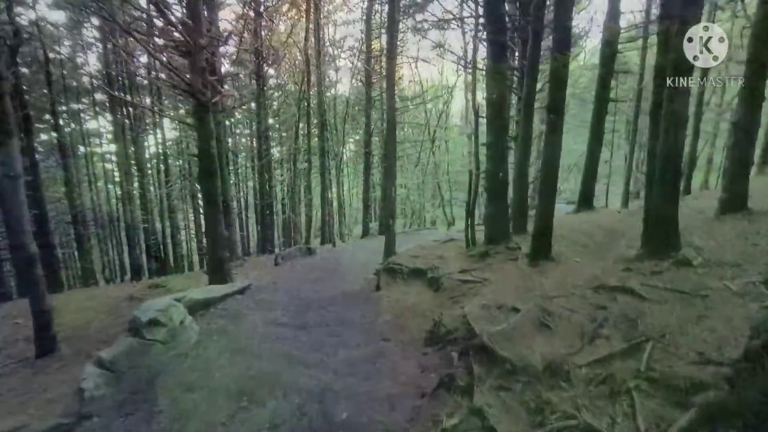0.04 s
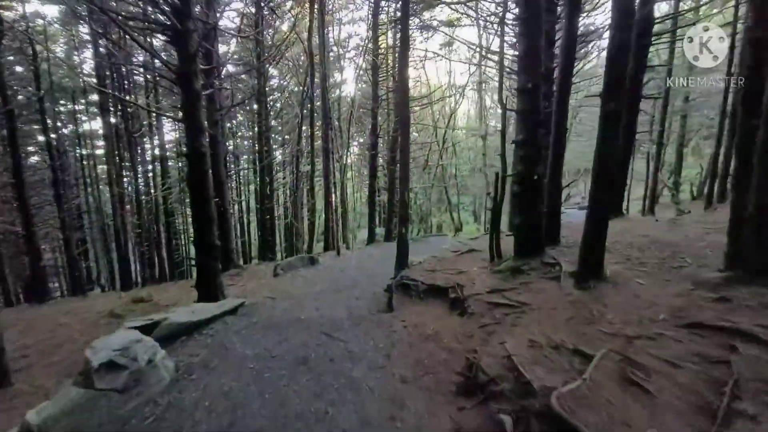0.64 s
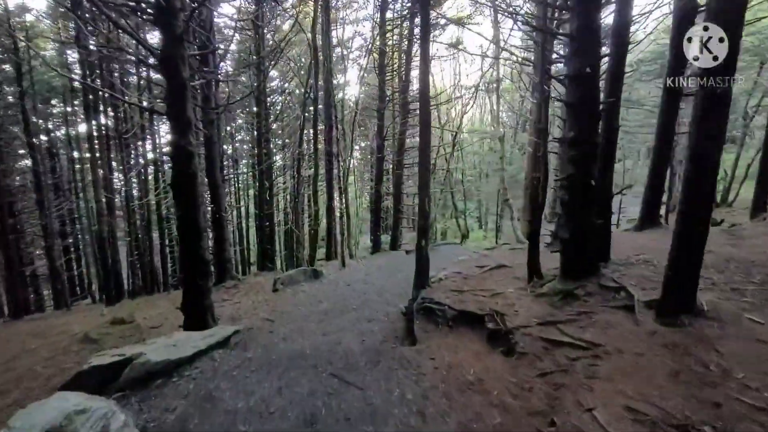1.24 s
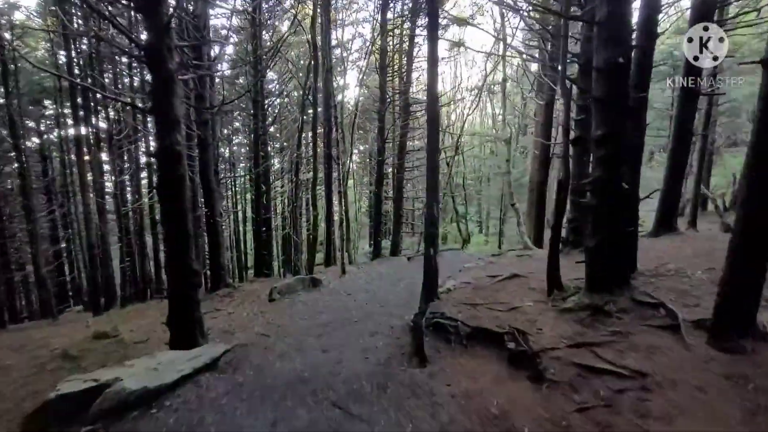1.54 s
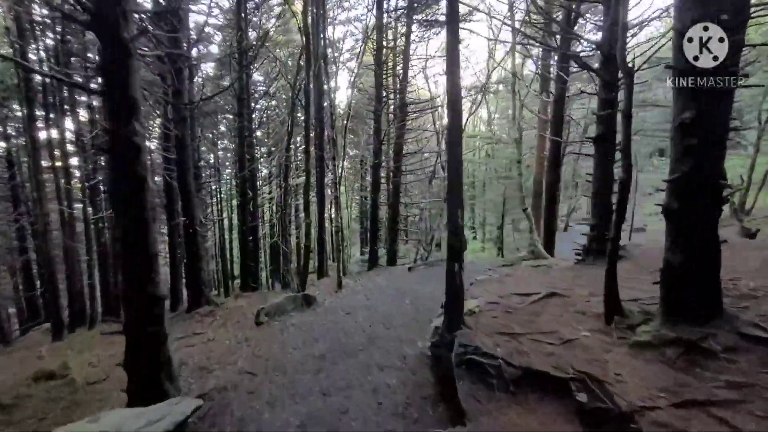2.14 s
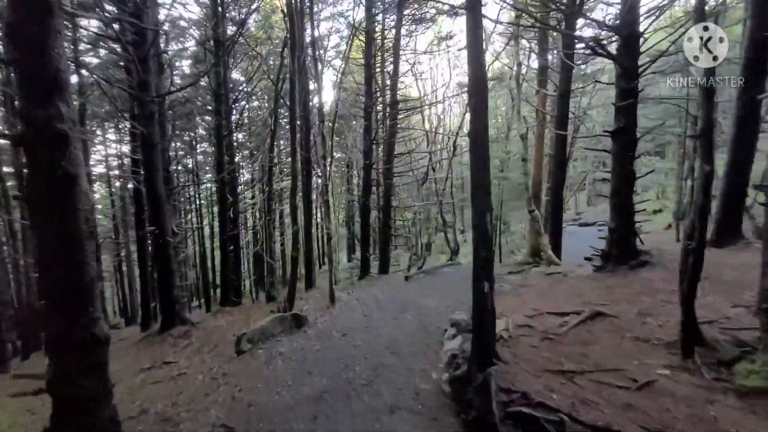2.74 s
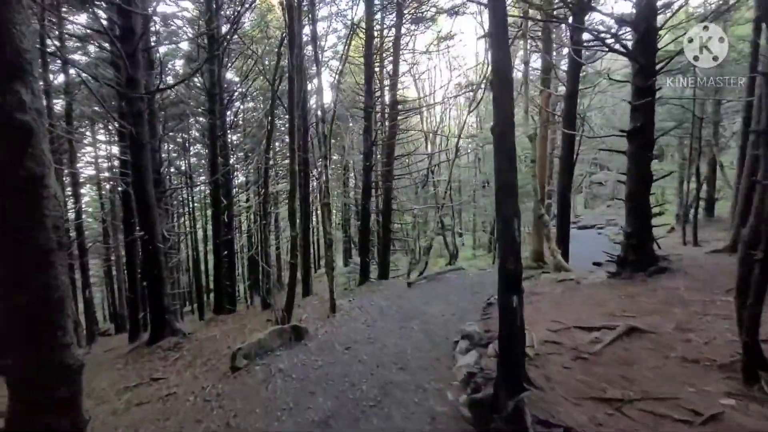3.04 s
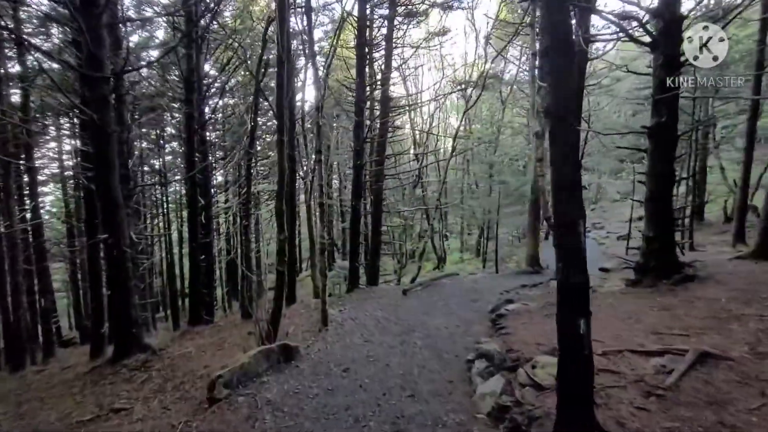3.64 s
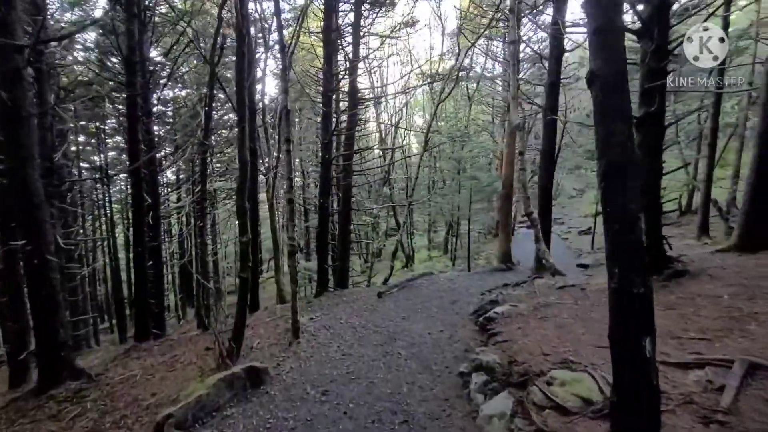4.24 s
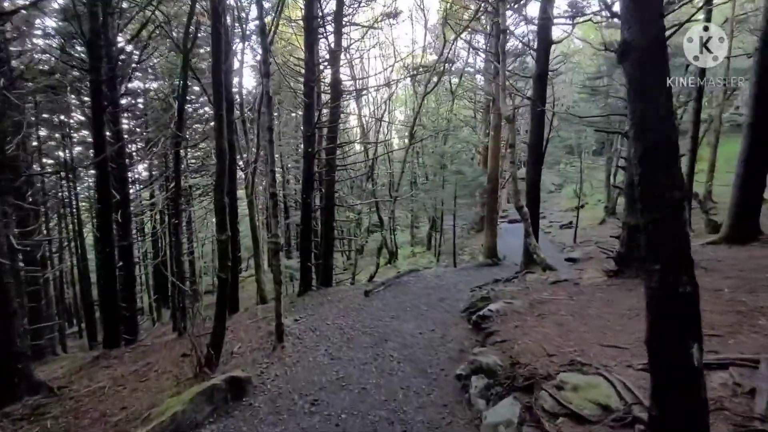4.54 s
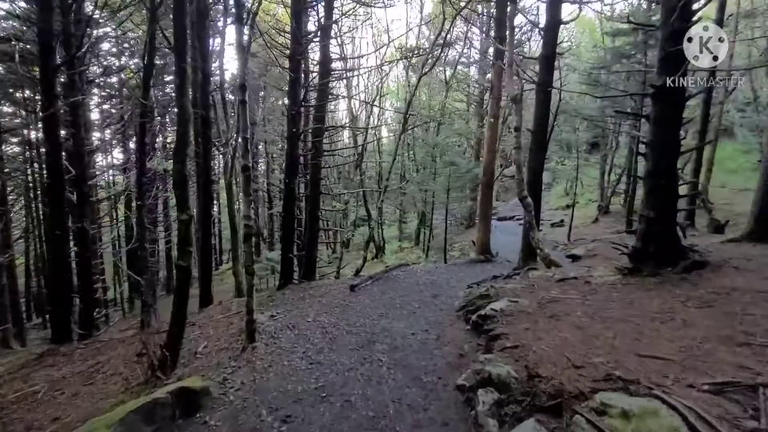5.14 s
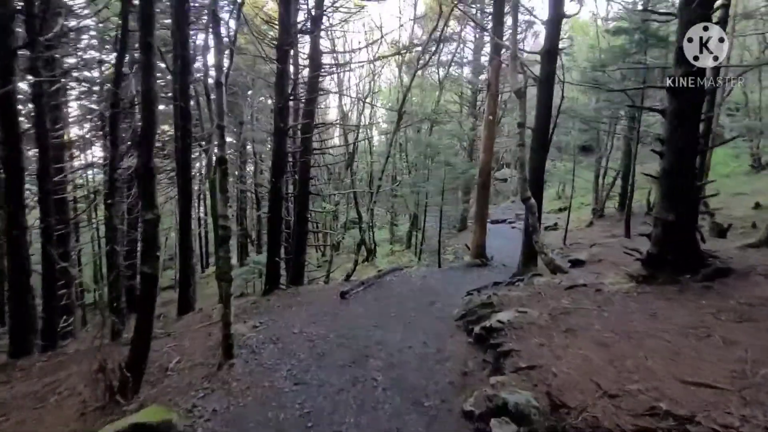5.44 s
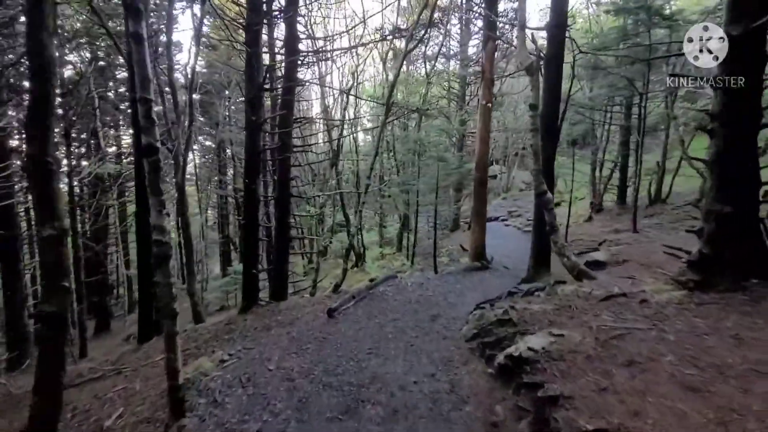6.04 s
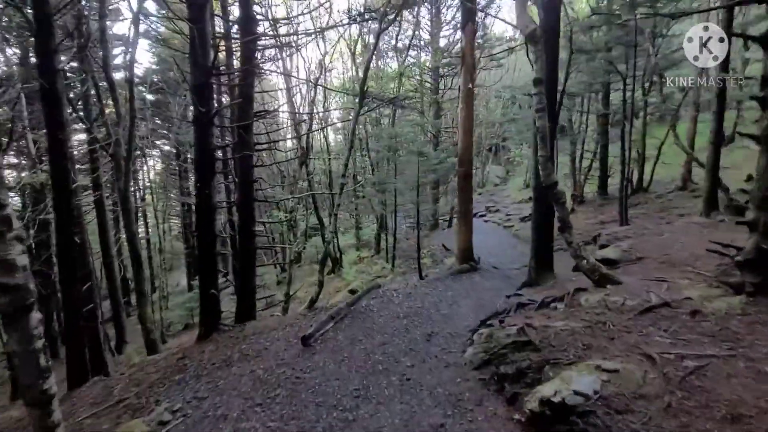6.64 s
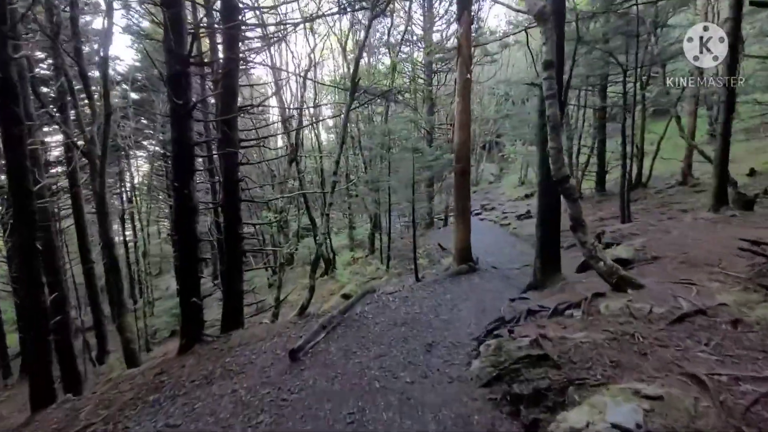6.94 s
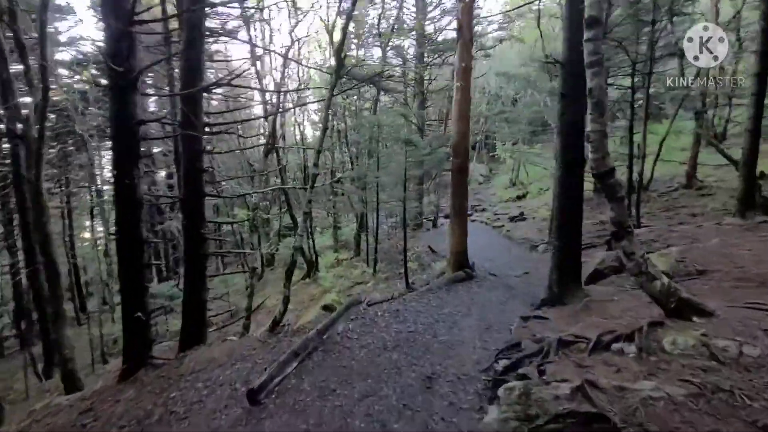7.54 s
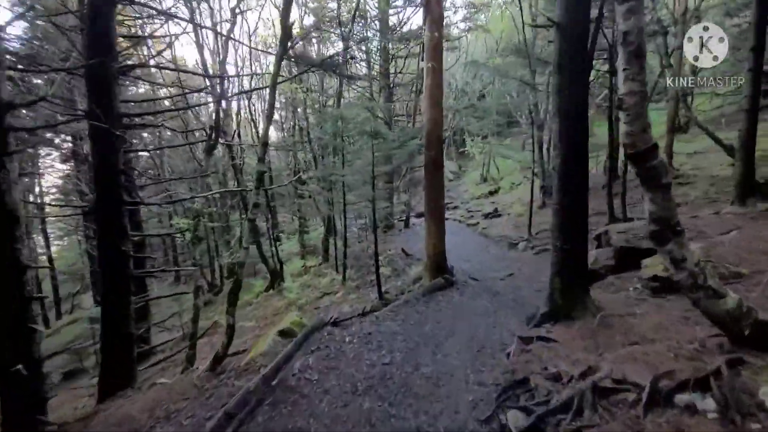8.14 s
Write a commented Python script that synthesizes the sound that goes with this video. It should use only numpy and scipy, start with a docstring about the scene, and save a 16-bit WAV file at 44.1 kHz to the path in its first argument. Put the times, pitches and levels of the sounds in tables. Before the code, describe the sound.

Steady footsteps crunch on a gravel forest path, with a rustling jacket, low wind bumps on the microphone and a faint, high bird.

```python
"""On a gravel trail through woodland, a hiker walks along with a camera in hand.
Boots thud on packed earth and grind the gravel, and single stones snap against each other.
A nylon jacket rustles as the arms swing, and squeaks near the start as its seams rub.
Wind bumps the microphone early and late, over the soft hush of air in the treetops.
A small bird pips, then sings six thin notes, each higher than the last. Tree trunks add faint echoes."""
import sys
import numpy as np
from scipy import signal
from scipy.fft import rfft, irfft, next_fast_len
from scipy.io import wavfile
from scipy.ndimage import uniform_filter1d, map_coordinates

SR = 44100
rng = np.random.default_rng(int(sys.argv[2]) if len(sys.argv) > 2 else 0)


def dump(signal):
    """Clip the signal to [-1, 1] and save it as 16-bit WAV at the path in sys.argv[1]."""
    limited = np.clip(np.atleast_2d(signal).T, -1, 1)
    pcm = np.round(limited * 32767).astype(np.int16)
    wavfile.write(sys.argv[1], SR, pcm)


N = 369999
TIME = np.arange(N) / SR
STRIKE_S = 0.0075  # how long a boot's edge takes to dig in

# The footsteps. Each row: heel strike in seconds, heel level in dB, time of full weight in seconds,
# crunch level in dB, roll-off in seconds, pitch of the stones under the sole in Hz, their strength in dB.
STEPS = [(0.49, -53.5, 0.545, -54.5, 0.66, 1400, 12), (1.008, -60, 1.128, -49, 1.163, 1440, -4.5),
         (1.546, -49.5, 1.625, -46, 1.67, 1680, -7), (2.083, -54.5, 2.135, -44.5, 2.175, 1750, -2),
         (2.593, -52, 2.675, -50.5, 2.73, 1730, -13), (3.172, -51, 3.27, -50.5, 3.29, 1600, -7),
         (3.706, -62, 3.748, -49.5, 3.825, 1590, -6), (4.262, -56.5, 4.34, -55, 4.41, 1480, 0),
         (4.965, -56, 5.065, -54.5, 5.09, 1450, -9), (5.426, -48, 5.47, -47.5, 5.51, 1590, 7),
         (5.897, -51.5, 5.995, -53.5, 6.04, 1420, -13), (6.445, -41, 6.48, -42.5, 6.56, 1520, 8),
         (7.009, -46.5, 7.08, -47, 7.105, 1330, -14), (7.544, -45.5, 7.635, -49.5, 7.648, 1670, -6),
         (8.03, -59, 8.1, -54, 8.14, 1500, 9)]
# The tone of grit under a boot. Each row: frequency in Hz, level in dB.
GRAVEL = [(90, -18), (200, -11), (400, 0), (650, 0.5), (900, 1), (1300, 1.5), (1750, 1.5), (2500, -3),
          (3800, -3.5), (5500, -14.5), (8000, -21), (15000, -28)]
# How alike left and right are for jacket and treetops. Each row: frequency in Hz, likeness (1 = same).
AIR_LIKENESS = [(100, 0.76), (350, 0.45), (900, -0.15), (2000, -0.3), (4000, 0.17), (8000, -0.15),
                (14000, 0.12)]
# Which side those two sounds favour. Each row: frequency in Hz, left minus right in dB.
AIR_BALANCE = [(200, 0.5), (1200, 2.5), (2700, -2.5), (4200, -0.5), (5600, 4), (7200, 10), (9500, -0.5),
               (14000, 2)]


def amp(db):
    """Turns decibels into a number to multiply by."""
    return 10 ** (np.asarray(db) / 20)


def unit(x):
    """Scales a signal so that its average strength (rms) is 1."""
    return x / np.sqrt(np.mean(x ** 2) + 1e-20)


def at_hz(table, hz):
    """Looks up a frequency in a table, blending between rows on a log-frequency scale."""
    freqs, values = np.transpose(table)
    return np.interp(np.log(hz + 1), np.log(abs(freqs) + 1), values)


def add(mix, start_s, sound):
    """Mixes a sound in at the given time."""
    part = mix[max(round(start_s * SR), 0):][:len(sound)]
    part += sound[:len(part)]


def filtered(x, gain):
    """Multiplies each frequency f in a signal by gain(f)."""
    size = next_fast_len(N + 4096, True)
    return irfft(rfft(x, size) * gain(np.fft.rfftfreq(size, 1 / SR)), size)[..., :N]


def drift(per_s):
    """A random wander of strength 1 that heads for a new value per_s times a second."""
    targets = rng.standard_normal(N // 8)
    return unit(np.interp(TIME * per_s, np.arange(len(targets)), targets))


def swell(centre_s, width_s):
    """A smooth rise and fall of height 1."""
    return np.exp(-.5 * ((TIME - centre_s) / width_s) ** 2)


def after_steps(lag_s, width_s):
    """A swell after every heel strike, or before it if the lag is negative."""
    return sum(swell(step[0] + lag_s, width_s) for step in STEPS)


def grains(per_s, spread_db):
    """Random clicks of uneven size, at the same moments on the left and right."""
    sizes = amp(spread_db * np.minimum(rng.exponential(1, N), 4))
    hits = rng.random(N) < per_s / SR
    return unit(sizes * hits * rng.choice([-1., 1.], (2, N)))


def patchy(x, patch_db, wide_hz, long_s):
    """Makes random bands of pitch louder or softer for a moment, as when contacts come and go."""
    spectrum = signal.stft(x, SR, nperseg=512, noverlap=384)[2]
    rows, columns = np.indices(spectrum.shape[1:])
    where = [rows * SR / 512 / wide_hz, columns * 128 / SR / long_s]
    patches = map_coordinates(rng.standard_normal((200, 1500)), where, order=1, mode="wrap")
    gain = unit(amp(patch_db * unit(patches)))
    return signal.istft(spectrum * gain, SR, nperseg=512, noverlap=384)[1][:, :N]


def stereo(pair, tone, likeness, balance, lead=((1, 0),)):
    """Blends two signals into left and right, using tables of tone, likeness, balance and phase lead."""
    alike = lambda f: np.clip(at_hz(likeness, f), -1, 1)
    right = filtered(pair[0], alike) + filtered(pair[1], lambda f: np.sqrt(1 - alike(f) ** 2))
    lean = lambda f: amp(at_hz(balance, f) / 2) * np.exp(.5j * at_hz(lead, f))
    gains = lambda f: amp(at_hz(tone, f)) * np.array([lean(f), 1 / lean(f)])
    return filtered(np.array([pair[0], right]), gains)


def on_ground(pair, tone=((1, 0),)):
    """Places a sound at the hiker's feet, as the two sides of the microphone hear it."""
    # How alike the sides are. Each row: frequency in Hz, likeness (1 = same).
    likeness = [(200, 1), (1200, 0.75), (1800, 0.91), (3800, 1), (7000, 0.22), (14000, .1)]
    # Which side is louder. Each row: frequency in Hz, left minus right in dB.
    balance = [(400, -1), (1100, -1.5), (1700, -8), (2700, -3), (4200, -5), (7000, 7), (11000, -1)]
    # Which side is ahead. Each row: frequency in Hz, the left side's lead in radians.
    lead = [(150, 0.27), (500, 1.5), (1100, -1), (1800, 0.43), (2700, 0.81), (4000, 1.7), (7000, 1.8)]
    return stereo(pair, tone, likeness, balance, lead)


def treetop_hush(level_db=-65.5):
    """Far-off air moves through the treetops with a gently uneven level."""
    # The tone of the hush. Each row: frequency in Hz, level in dB.
    tone = [(30, -6.5), (65, 8.5), (100, -2), (135, -2), (220, -3.5), (390, 3), (710, -6.5), (1000, -7.5),
            (1830, -2.5), (2500, -10), (3900, -8), (6000, -22.5), (7200, -20), (9500, -24), (15400, -23.5)]
    air = rng.standard_normal((2, N)) * amp(.5 * drift(11))
    air = patchy(air, patch_db=2.63, wide_hz=219, long_s=0.05)
    air = stereo(air, tone, AIR_LIKENESS, AIR_BALANCE)
    return amp(level_db) * air / np.std(air.mean(0))


def wind():
    """Swirls of air bump each side of the microphone; hard gusts add smaller, higher-sounding swirls."""
    # The strength of the breeze. Each row: time in seconds, level in dB.
    gusts = [(0, -42.5), (.25, -43.5), (.38, -33), (.55, -44.5), (.78, -45), (1.12, -65.5), (3, -79),
             (4.85, -76), (5.7, -62.5), (6.3, -71), (6.86, -75.5), (6.91, -54.5), (8.39, -56.5)]
    # Single puffs within it. Each row: time in seconds, boost in dB.
    puffs = [(.69, 4.5), (1.46, 8), (2.16, 8), (5.05, 19), (6.59, 14), (7.28, 6), (7.44, 7.5), (7.6, 0),
             (7.91, 8.5), (8.24, 6)]
    # The tone of the rumble. Each row: frequency in Hz, level in dB.
    rumble = [(10, -18), (25, -2), (42, -2.5), (60, 3.5), (85, -7.5), (110, -15), (150, -33), (230, -37),
              (500, -67), (2000, -93)]
    # The side the wind comes from. Each row: time in seconds, left minus right in dB.
    sides = [(0, 11.5), (.45, 2), (.7, 5.5), (2, -5.5), (6, -8.5), (7.1, -3.5), (7.7, -7), (8.39, -5)]
    jolt_db = 4 * (after_steps(lag_s=0.087, width_s=0.066) - .5)  # each step swings the microphone
    gust_db = np.interp(TIME, *np.transpose(gusts)) + jolt_db + 3.1 * drift(22)
    gust_db += sum(db * swell(s, width_s=0.028) for s, db in puffs)
    big = stereo(rng.standard_normal((2, N)), rumble, likeness=[(30, 0.024)], balance=[(30, 0.018)])
    big /= np.sqrt(uniform_filter1d(big.mean(0) ** 2, size=5000) + 1e-12)  # the gust sets the strength
    higher_tone = lambda f: amp(at_hz(rumble, f / 1.28) + at_hz([(60, -27), (110, 5)], f))
    small = unit(filtered(rng.standard_normal((2, N)), higher_tone))
    small_db = np.minimum(2.9 * (gust_db + 44), 0) - 13
    lean_db = np.interp(TIME, *np.transpose(sides)) * np.array([[.5], [-.5]])
    return (big + small * amp(small_db)) * amp(gust_db + lean_db)


def jacket_rustle():
    """Nylon rubs with the swing of the arms, making a fine, dense crackle."""
    # How briskly the jacket moves. Each row: time in seconds, level in dB.
    movement = [(0, -82), (.6, -79), (1.7, -78), (2.7, -77), (3.05, -85), (3.3, -75.5), (4.2, -85.5),
                (4.75, -84.5), (5, -78), (5.6, -72), (6.3, -72.5), (6.9, -77), (7.7, -73.5), (8.39, -74)]
    # The tone of rubbing nylon. Each row: frequency in Hz, level in dB.
    nylon = [(120, 9), (350, 14), (700, 18), (1000, 12), (1900, 15), (2700, 11), (4000, 9.5), (5500, 3.5),
             (7000, -1), (9000, -1.5), (12500, -1), (15000, -2.5)]
    # The jacket calms just before a heel strike and is jolted just after it.
    # Each row: delay from the strike in seconds, width in seconds, change in dB.
    rubs = [(-.075, 0.076, -1.5), (.055, 0.048, 3.5)]
    # A sleeve brushes the hiker's side. Each row: time in seconds, width in seconds, change in dB.
    sleeves = [(.1, 0.027, -2), (.48, 0.046, 5.5), (.75, 0.043, 1.5), (1.49, .02, 3.5), (1.85, 0.0088, 3.5),
               (3.93, 0.024, 8), (4.53, 0.056, 9), (6.245, 0.011, 5), (6.74, 0.057, 5.5),
               (7.41, 0.065, 3.5), (7.8, 0.058, 4.5)]
    fibres = grains(per_s=7000, spread_db=-0.5) * amp(1.57 * drift(70))
    fibres = patchy(fibres, patch_db=2.5, wide_hz=273, long_s=.04)
    rustle = stereo(fibres, nylon, AIR_LIKENESS, AIR_BALANCE)
    rustle /= band_strength(rustle, 8500, 15000)
    swing_db = sum(db * after_steps(lag_s, width_s) for lag_s, width_s, db in rubs)
    swing_db += sum(db * swell(s, width_s) for s, width_s, db in sleeves)
    return rustle * amp(np.interp(TIME, *np.transpose(movement)) + swing_db - 0.5)


def band_strength(pair, low_hz, high_hz):
    """The strength (rms) between two frequencies, with left and right averaged."""
    return np.std(filtered(pair.mean(0), lambda f: (f > low_hz) & (f < high_hz))) + 1e-12


def pebbles(clicks, ring_gain, cycles, sizes=12):
    """Each click briefly rings a pebble, whose size sets its pitch."""
    which = rng.integers(0, sizes, N)
    t, rings = np.arange(512) / SR, np.zeros((2, N))
    for k, hz in enumerate(np.geomspace(450, 4200, sizes)):
        ring = np.exp(-t * hz / cycles) * np.cos(2 * np.pi * hz * t) * hz / SR / cycles
        rings += signal.oaconvolve(clicks * (which == k), ring[None], axes=1)[:, :N]
    return clicks + ring_gain * rings


def bite(t, fade_s):
    """A boot's edge digs in: the level rises quickly up to t = 0, then fades."""
    return np.clip(1 + t / STRIKE_S, 0, 1) ** 2 * np.exp(-np.maximum(t, 0) / fade_s)


def gravel_crunch(loading_db=-13.5, easing_db=-8.5, settle_db_per_s=227):
    """Pebbles slip under each boot: open grit at the heel, a hollow scrunch as the sole covers them."""
    # A boot lightly skims the gravel. Each row: time in seconds, level in dB.
    scuffs = [(0.048, -64), (1.221, -55.5), (1.775, -60.5), (2.77, -65.5), (3.861, -65), (4.016, -58.5),
              (5.391, -62), (6.23, -62), (7.69, -63)]
    slips = pebbles(grains(per_s=1700, spread_db=3.5), ring_gain=3.55, cycles=2.1)
    slips = patchy(slips, patch_db=2.0, wide_hz=326.6, long_s=.05)
    slips /= np.sqrt(abs(uniform_filter1d((slips ** 2).mean(0), size=700)) + 1e-6)  # stones share the load
    grit = on_ground(slips, GRAVEL)
    strength = band_strength(grit, 800, 3000)
    out = np.zeros((2, N))
    for heel_s, heel_db, full_s, crunch_db, off_s, ring_hz, ring_db in STEPS:
        on = (TIME > heel_s - STRIKE_S) & (TIME < off_s + 40 / settle_db_per_s)
        t = TIME[on]
        sole_db = crunch_db + np.interp(t, [heel_s, full_s, off_s], [loading_db, 0, easing_db])
        sole_db -= settle_db_per_s * np.maximum(t - off_s, 0)
        heel = amp(heel_db) * bite(t - heel_s, fade_s=0.034)
        sole = amp(sole_db) * bite(t - heel_s, fade_s=np.inf)
        hollow = signal.lfilter(*signal.iirpeak(ring_hz, Q=2.4, fs=SR), grit[:, on])
        hollow *= strength / np.std(hollow.mean(0))
        covered = amp(ring_db) * (1 - np.exp(-(t - t[0]) / 0.042))
        out[:, on] += np.hypot(heel, sole) * (grit[:, on] + covered * hollow) / (1 + 1.19 * covered)
    out += grit * sum(amp(db) * bite(TIME - s, fade_s=0.033) for s, db in scuffs)
    # A few loose pebbles keep shifting, and calm down just before each step.
    loose = pebbles(grains(per_s=320, spread_db=3.0), ring_gain=4.8, cycles=1.7)
    loose *= amp(-6 * after_steps(lag_s=-0.16, width_s=0.16))
    return (out + on_ground(unit(loose) * amp(-76.5), GRAVEL)) / strength


def knock(hz, cycles, phase):
    """A short ring that swells for the given number of cycles, then dies away."""
    t = np.arange(SR // 20) / SR
    age = t * hz / cycles
    return age * np.exp(1 - age) * np.sin(2 * np.pi * (hz * t + phase))


def stone_snaps():
    """A stone snaps against another, settles with a second touch and rattles its neighbours."""
    # The loudest stones. Each row: time in seconds, level in dB, pitch in Hz.
    hits = [(0.065, -33.5, 2560), (0.315, -39.5, 1640), (0.585, -37, 1240), (0.611, -37.5, 1330),
            (0.646, -41, 1360), (0.655, -35.5, 1420), (0.671, -39.5, 1800), (1.012, -29.5, 3230),
            (1.115, -39, 1130), (1.197, -38, 2080), (1.255, -42, 1850), (1.621, -25, 1370),
            (2.186, -18, 1860), (2.502, -40.5, 1800), (2.716, -34.5, 2200), (2.901, -43.5, 1640),
            (2.923, -43, 2830), (3.046, -43.5, 2100), (3.177, -26.5, 2900), (3.223, -42, 1510),
            (3.264, -31.5, 1510), (3.279, -33, 1710), (3.706, -36.5, 1760), (3.749, -30, 1570),
            (4.358, -38, 1610), (4.855, -47, 1310), (4.981, -35, 2720), (5.258, -45, 1260),
            (5.428, -30, 1300), (5.897, -35, 2680), (5.941, -33.5, 1640), (6.141, -40.5, 1580),
            (6.473, -21, 1380), (6.507, -31, 1310), (6.524, -36, 1380), (6.556, -25.5, 1570),
            (6.562, -28.5, 1500), (6.979, -40, 1470), (7.029, -30, 1110), (7.066, -33.5, 1400),
            (7.079, -27, 1600), (7.218, -30.5, 1940), (7.2209, -35.5, 2210), (7.368, -42, 1830),
            (7.495, -39, 1970), (7.532, -35, 1540), (7.552, -32, 1500), (7.606, -29.5, 1230),
            (7.628, -24, 1590), (7.645, -26, 1700)]
    # The tone of a snap: thin in the bass, with a bright edge. Each row: frequency in Hz, gain in dB.
    snap_tone = [(200, -16), (900, -2), (3500, -0.5), (5500, 5), (8500, -8), (15000, -6)]
    snaps, rattle = np.zeros(N), np.zeros(N)
    t = np.arange(SR // 10) / SR
    for (s, db, hz), (phase, wait, size) in zip(hits, rng.random((len(hits), 3))):
        first_touch = knock(hz, 0.5, phase) + amp(-16) * knock(hz * 1.6, .5, size)
        second_touch = knock(hz * (0.89 + 0.53 * size), 2.7, wait)
        add(snaps, s + .0007, amp(db - 2) * first_touch)
        add(snaps, s + 0.002915 + 0.00334 * wait, amp(db - 13.5) * second_touch)
        add(rattle, s - .001, amp(db - 26) * t / 0.0032 * np.exp(1 - t / 0.004))
    clicks = grains(per_s=4600, spread_db=-5.5)
    neighbours = on_ground(clicks * rattle, GRAVEL) / np.std(on_ground(clicks, GRAVEL))
    return on_ground(np.array([snaps, np.roll(snaps, 3)]), snap_tone) + neighbours


def bird(slide_s=0.0465):
    """A bird in a tree on the left gives tiny pips, then thin, slightly trembling whistles."""
    # Faint, high calls. Each row: start in seconds, level in dB, pitch in Hz.
    pips = [(0.1944, -61, 9900), (0.4314, -62, 9960), (0.4668, -60, 9860), (0.6539, -65, 9400),
            (0.7018, -62, 9500), (0.7387, -58, 9800), (0.7814, -68, 9370)]
    # The song. Each row: start and length in seconds, first and settled pitch in Hz, level in dB.
    notes = [(3.37, .19, 7070, 6995, -66), (3.65, .18, 7260, 7085, -58.5), (3.9, .26, 7270, 7308, -57.5),
             (4.215, .26, 7560, 7462, -60), (4.465, .25, 7600, 7450, -58), (4.735, .23, 7660, 7680, -67.5)]
    out = np.zeros(N)
    tremble = 1 + 0.0027 * drift(220)
    flutter = amp(2.6 * drift(50) - 1)
    for s, db, hz in pips:
        glide = np.linspace(1.01, .99, 900) + .13 * rng.standard_normal(900)
        phase = 2 * np.pi * np.cumsum(hz * glide) / SR
        add(out, s, amp(db - 8) * np.hanning(len(glide)) * np.sin(phase))
    for s, length_s, first_hz, settled_hz, db in notes:
        on = (TIME > s) & (TIME < s + length_s)
        t = TIME[on] - s
        hz = settled_hz + (first_hz - settled_hz) * np.exp(-t / slide_s)
        phase = 2 * np.pi * np.cumsum(hz * tremble[on]) / SR
        swell_db = np.interp(t / length_s, [0, 0.33, 1], [-13, 0, -25])
        out[on] += amp(db + swell_db) * np.sin(phase) * signal.windows.tukey(len(t), .2)
    return out * flutter * amp([[3], [-6]])


def jacket_squeaks(fastest_at=0.51, fade_db_per_s=138):
    """Ribs in the nylon catch on each other and sing, higher when the rubbing is faster."""
    # Two seams squeak at a time.
    # Each row: start and length in seconds, first and top pitch in Hz, level in dB.
    squeaks = [(0.269, 0.058, 1370, 1730, -55), (0.271, 0.044, 2490, 2920, -57),
               (0.358, 0.097, 1406, 3690, -58.5), (0.363, 0.07, 4000, 5480, -56.5),
               (0.521, .055, 1880, 4040, -56.5), (0.511, 0.059, 3880, 6380, -56)]
    # The tone of the cloth. Each row: frequency in Hz, gain in dB.
    cloth = [(1000, -9), (1700, 6), (2700, -1), (3900, 8.5), (5300, 7), (6500, 1), (9000, -24)]
    out = np.zeros((2, N))
    for s, length_s, first_hz, top_hz, db in squeaks:
        on = (TIME > s) & (TIME < s + length_s)
        t = TIME[on] - s
        speed = np.sin(np.pi / 2 * t / length_s / fastest_at) ** 2
        roughness = 1 + 0.065 * drift(2500)[on]
        hz = (first_hz + (top_hz - first_hz) * speed) * roughness
        phase = 2 * np.pi * (np.cumsum(hz) / SR + np.array([[0], [.2]]))
        rub_db = -4 * (1.5 - speed)  # slow rubbing is quieter
        fade_db = -fade_db_per_s * (t - length_s / 2)  # the seams part as they slide
        out[:, on] += amp(db + rub_db + fade_db) * np.sin(phase) * signal.windows.tukey(len(t), .3)
    return filtered(out, lambda f: amp(at_hz(cloth, f)))


def boot_thuds():
    """The sole knocks on packed earth, which then briefly settles."""
    # The dull knocks. Each row: time in seconds, level in dB, pitch in Hz.
    thuds = [(1.004, -47.5, 256), (1.227, -37.5, 500), (1.535, -41, 427), (2.589, -46, 520),
             (3.164, -39.5, 390), (3.259, -40.5, 600), (3.475, -47, 560), (3.702, -42, 670),
             (3.801, -45.5, 700), (4.013, -47.5, 523), (4.566, -40, 470), (4.57, -45.5, 250),
             (5.391, -43.5, 290), (5.47, -31.5, 517), (6.044, -44, 370), (6.449, -39, 440),
             (6.517, -44, 380), (6.564, -40.5, 670), (6.958, -45, 393), (7.009, -36.5, 555),
             (7.057, -41, 600), (7.078, -26.5, 593), (7.6, -38.5, 534), (8.031, -41.5, 385),
             (8.147, -45.5, 270)]
    # The tone of settling earth. Each row: frequency in Hz, level in dB.
    earth = [(80, -18), (180, -7.5), (380, 12.5), (700, 9.5), (1200, -24), (3000, -33), (9000, -60)]
    knocks, settling = np.zeros(N), np.zeros(N)
    t = np.arange(SR // 8) / SR
    for (s, db, hz), phase in zip(thuds, rng.random(len(thuds))):
        add(knocks, s + 0.00079, amp(db - 4) * knock(hz, 0.96, 0))  # hollow knock
        add(knocks, s + 0.00245, amp(db - 15.5) * knock(hz * 1.95, 1.0, phase))  # higher slap
        add(knocks, s + 0.0028, amp(db - 13) * knock(hz * 0.37, 0.36, 0))  # low push
        add(settling, s, amp(db - 14.5) * np.exp(-t / 0.013))
    crumbs = unit(on_ground(grains(per_s=900, spread_db=0.5), earth))
    return knocks * amp([[0], [.3]]) + settling * crumbs


def trunk_echoes(sound, echoes_per_s=1500):
    """Sound bounces off the tree trunks, and each band of pitch dies away at its own speed."""
    # How long echoes last. Each row: frequency in Hz, seconds to fade by 60 dB.
    fade_times = [(200, 0.9), (1500, 0.26), (7000, 0.76), (14000, 0.071)]
    bounces = rng.standard_normal((2, SR // 2)) * (rng.random((2, SR // 2)) < echoes_per_s / SR)
    hz, t, spectrum = signal.stft(bounces, SR, nperseg=256)
    fade = amp(-60 * t / at_hz(fade_times, hz)[:, None])
    tail = signal.istft(spectrum * fade, SR, nperseg=256)[1]
    return signal.fftconvolve(sound, tail / np.linalg.norm(tail[0]), axes=1)[:, :N]


def scene():
    """Mixes the walk; the distant bird echoes much more than the nearby sounds."""
    near = gravel_crunch() + stone_snaps() + boot_thuds() + jacket_squeaks()
    far = bird()
    echoes = trunk_echoes(near * amp(-22) + far * amp(-3))
    return near + far + echoes + jacket_rustle() + treetop_hush() + wind()


def record(dry, cutoff_hz=15550):
    """The camera cuts off the very highest treble."""
    low_pass = signal.firwin(511, cutoff_hz, window=("kaiser", 9), fs=SR)
    return signal.oaconvolve(dry, low_pass[None], "same")


dry = scene()
out = record(dry)
dump(out)
```